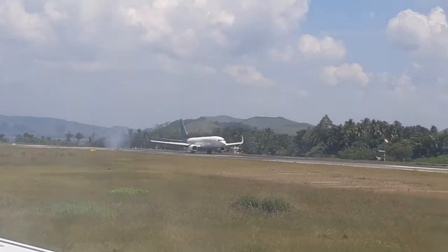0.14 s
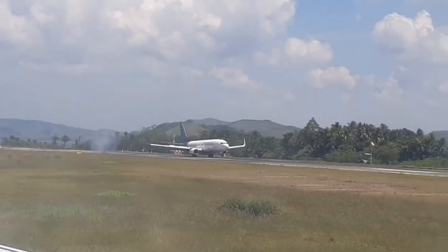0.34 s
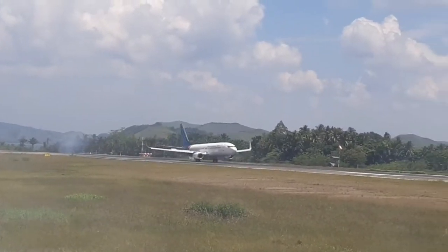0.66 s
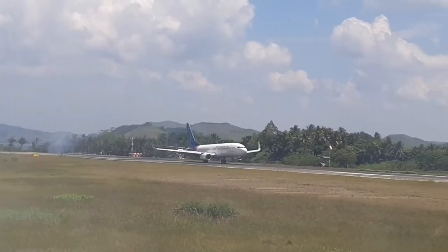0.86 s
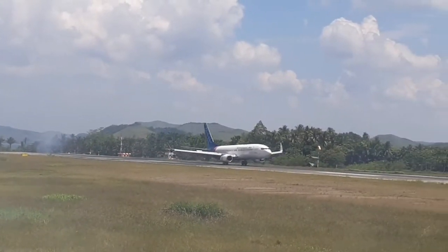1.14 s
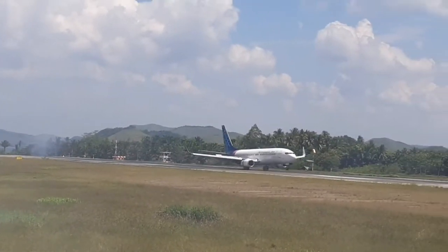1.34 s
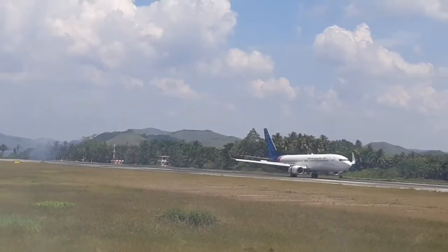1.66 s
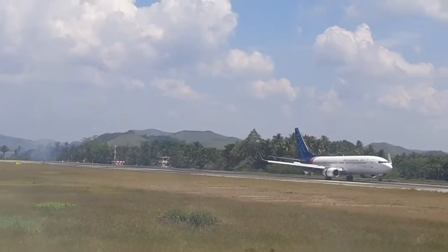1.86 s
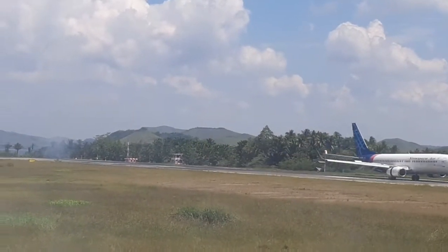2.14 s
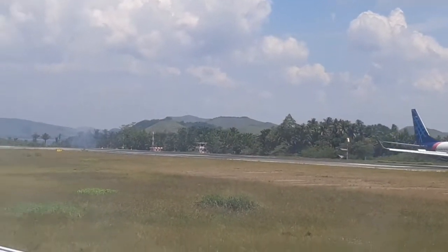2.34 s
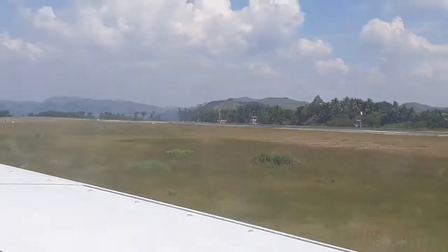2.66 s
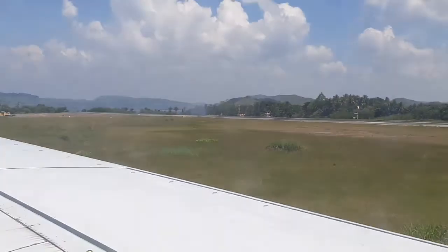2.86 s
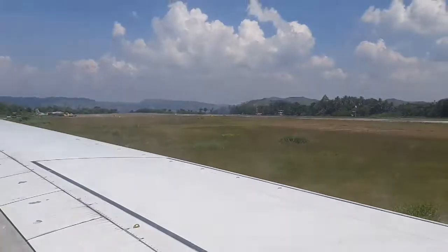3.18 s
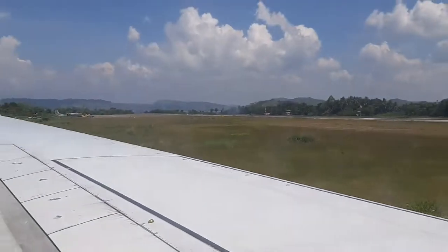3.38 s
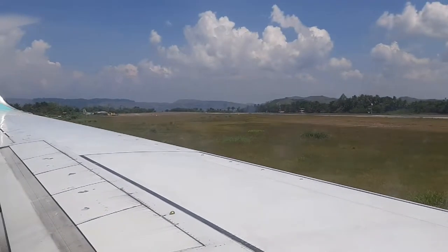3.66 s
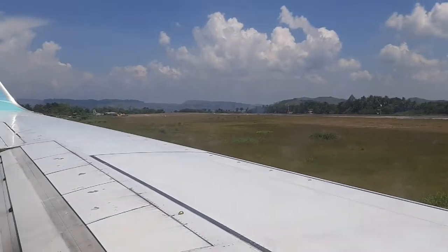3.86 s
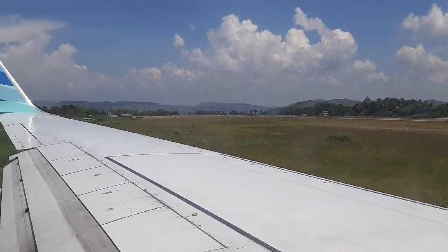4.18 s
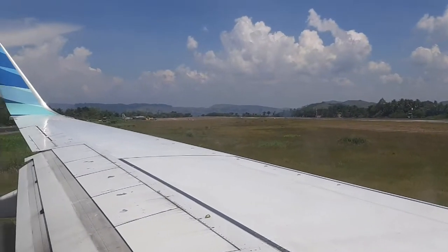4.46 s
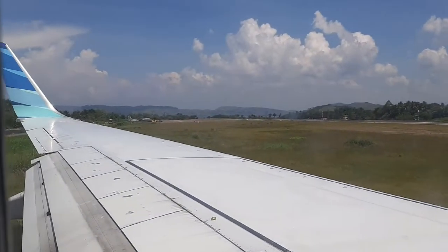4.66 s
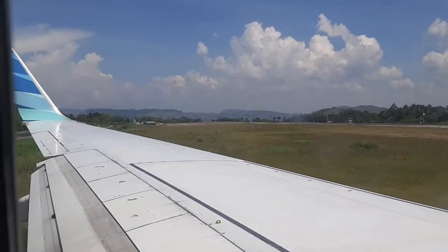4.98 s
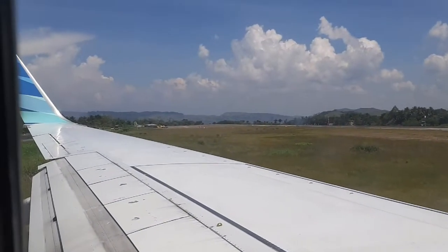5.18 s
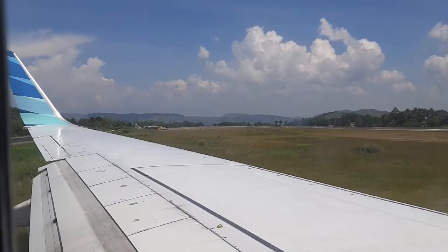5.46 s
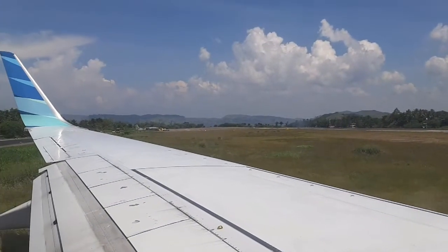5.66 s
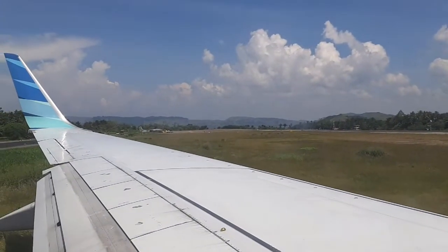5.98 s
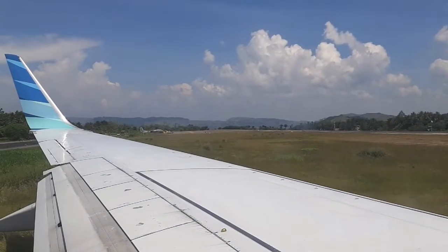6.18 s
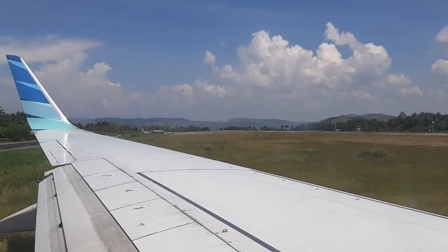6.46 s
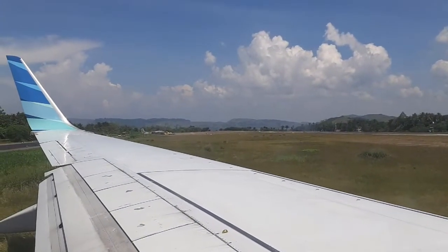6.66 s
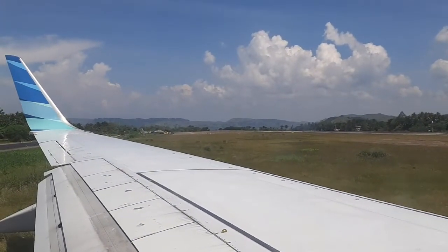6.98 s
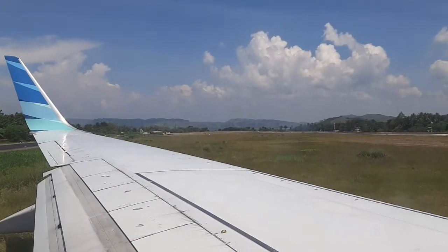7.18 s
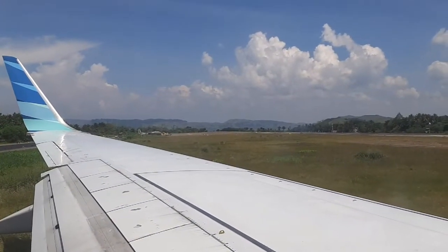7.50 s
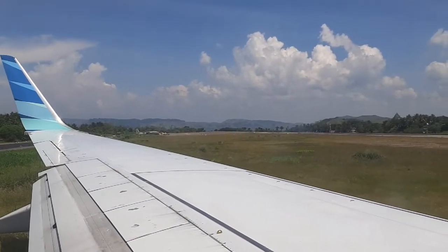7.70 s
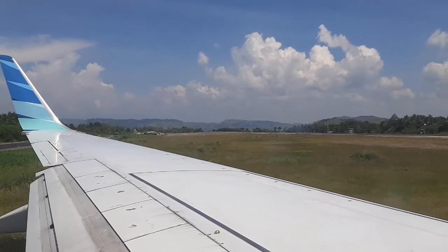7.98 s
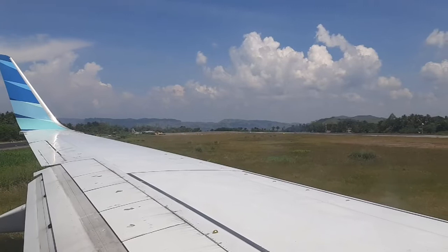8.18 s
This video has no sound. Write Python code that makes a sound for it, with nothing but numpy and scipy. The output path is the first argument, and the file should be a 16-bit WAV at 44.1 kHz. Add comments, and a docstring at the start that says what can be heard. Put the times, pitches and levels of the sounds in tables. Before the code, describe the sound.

Inside an airliner cabin at a window seat, close and enclosed, with wide airy hiss around a centred low rumble. From 0 s a muffled engine drone and steady low hum run under slowly beating fan tones, thin wandering whines and vent air; the drone lifts slightly at 0.4 s. A thud and scuff come at about 0.5 s, with more dull bumps around 2.6, 2.9 and 3.2 s. Wheel rumble roughens around 3.6 s, and hum, roar and a higher turbine whine swell near 4 s, then ease gradually. Small crisp rustles and ticks sound near 4.8 and 5.8 s, and a soft bump at 6.2 s. At 7.6 s a sharp click jumps straight into a far louder, heavy bass boom, surging and dropping irregularly beneath a steadier roar and brighter air. A tick follows at 7.8 s, a strong thud at 8 s, and the rumble stops abruptly around 8.3 s.

```python
"""Airliner cabin at a window seat, first taxiing, then under a much heavier rumble.
From the start: filtered-noise rumble and vent air, a shaft hum, beating fans, tones and wandering whines.
Drone and hum start softer and lift at 0.4 s; bumps thud and rustles tick at intervals throughout.
Rough ground swells the wheels at 3.6 s; hum, drone, roar and the higher turbine whine swell around 4 s,
while the lower whine eases. At 7.58 s a click, then a surging boom, roar and brighter air."""
import sys
import numpy as np
from scipy import signal
from scipy.fft import rfft, irfft
from scipy.io import wavfile
from scipy.ndimage import uniform_filter1d

SR = 44100
rng = np.random.default_rng(int(sys.argv[2]) if len(sys.argv) > 2 else 0)


def pcm_store(signal):
    """Save signal as 16-bit PCM."""
    levels = np.round(np.clip(np.atleast_2d(signal), -1, 1) * 32767)
    wavfile.write(sys.argv[1], SR, levels.astype(np.int16).T)


N = 367773

# fuselage rumble spectrum: freq_hz, density_db (relative, per Hz)
TAXI_RUMBLE = [(13, -55), (28, -35), (50, -17.5), (80, -3.5), (130, 0.5), (175, -1.5), (220, 0),
               (255, -3.5), (370, -4.5), (470, -15), (530, -16), (780, -23.5), (1000, -32.5), (1400, -68),
               (3000, -120)]
HEAVY_RUMBLE = [(13, -63), (28, -38), (48, -16), (75, -11), (112, -2.5), (133, 3), (155, -3.5), (200, -6),
                (224, -2.5), (245, -9.5), (330, -9.5), (410, -17), (500, -28), (550, -25.5), (680, -28.5),
                (1000, -49.5), (2200, -110)]
# rushing air spectrum: freq_hz, density_db (relative, per Hz)
TAXI_AIR = [(600, -6), (1000, 0.5), (1170, -0.5), (1300, -0.5), (1550, 0), (1720, 0.5), (1850, -3),
            (1970, 1), (2400, 1), (2650, -3.5), (3150, -5.5), (3500, -6), (4350, -6), (4800, -13),
            (6700, -16.5), (8600, -25.5), (12200, -28), (13000, -34), (13500, -90)]
HEAVY_AIR = [(300, -63), (900, 4), (1500, 1), (2900, -2), (3750, -1.5), (4400, -6.5), (5500, -7),
             (5900, -17), (6900, -18.5), (7900, -15), (8500, -21.5), (12000, -21), (13000, -27),
             (13600, -83)]
# width of the cabin's sound field: freq_hz, side_minus_mid_db
TAXI_WIDTH = [(60, -36), (110, -21), (200, -19), (370, -18.5), (670, -1), (1230, 3), (2260, -2.5),
              (4130, -1), (7560, 0), (13800, -1.5)]
HEAVY_WIDTH = [(60, -16), (110, -23), (200, -17), (370, -14.5), (670, -3), (1230, 2.5), (2260, 0),
               (4130, -1), (7560, 0.5), (13800, -5)]
# lean of the sound field: freq_hz, left_minus_right_db
TAXI_LEAN = [(60, 1), (110, 0.0), (200, 0), (370, 2), (670, 2), (1230, 1), (2260, -5), (4130, -2),
             (7560, 0.5), (13800, -1)]
HEAVY_LEAN = [(60, 0), (110, 0.5), (200, 1.5), (370, 2), (670, 3), (1230, 0.5), (2260, -0.5), (4130, -3.5),
              (7560, -6), (13800, 0)]
# boom level as it surges and eases: time_s, level_db
BOOM_SURGES = [(7.585, -9), (7.693, -7.5), (7.717, -11), (7.751, -9), (7.809, -9.5), (7.851, -19),
               (7.873, -10), (7.939, -13), (7.973, -25), (7.999, -8), (8.025, -16), (8.045, -10.5),
               (8.105, -13), (8.197, -9.5), (8.231, -14), (8.33, -9)]
# harmonics of the first of two cabin fans: order (multiple of the shaft rate), left_db, right_db
FAN_ORDERS = [(1, -34.5, -36.5), (2, -55, -48), (3, -48, -65), (5, -75, -54), (6, -64, -55),
              (7, -53.5, -63), (9, -83, -79)]
# tones of pumps, gears and turbines: pitch_hz, mid_db, side_db
MACHINE_TONES = [(98.5, -37, -59), (300.6, -43, -56), (885.5, -56, -60), (1334, -65, -68),
                 (1348.3, -52.5, -72), (1366, -63, -67), (1386, -65, -61), (1465, -61, -56),
                 (1763, -63, -64), (2079, -65, -67), (2644, -67, -62), (2655, -66, -68), (2775, -75, -64),
                 (3121, -68, -71), (3525.5, -66, -65), (4245, -67, -66)]
# unsteady whines and cabin resonances: centre_hz, width_hz, level_db (each ear gets 3 dB more)
TAXI_WHINES = [(452.2, 15.4, -40.5), (686, 24, -46), (749, 20, -53.5), (882, 22, -59), (1457, 40, -53.5),
               (2100, 130, -54), (2520, 44, -63), (2853, 54, -60.5), (2930, 23, -56.5), (3360, 98, -58.5)]
HEAVY_WHINES = [(1827, 23, -50)]
# hunting turbine whines: pitch_hz, swell_rise_hz, wander_hz, wander_rate_hz, left_db, right_db,
# swell_change_db (negative eases)
TURBINES = [(1439, 10, 10.13, 12.4, -55, -48, -2.5), (2125, 4, 48, 16, -60.5, -57, 6.5)]
# bumps in the ground: start_s, envelope_peak_db
BUMPS = [(0.478, -13), (2.622, -19), (2.896, -11.5), (3.21, -18), (4.484, -30), (6.249, -21), (7.998, -7)]
# nearby rustles and ticks: start_s, rise_s, decay_s, scrape_db, resonance_hz, resonance_db
RUSTLES = [(0.479, 0.006, 0.013, -33, 5100, -34), (0.489, 0.003, 0.014, -46, 2120, -35),
           (0.495, 0.003, 0.017, -45, 5430, -41), (2.52, 0.02, 0.2, -57, 6500, -58),
           (4.56, 0.054, 0.08, -50, 6800, -53), (4.793, 0.0072, 0.005, -50, 4900, -39),
           (4.8, 0.002, 0.004, -41, 5800, -31), (4.808, 0.002, 0.0086, -38, 6500, -40),
           (5.785, 0.015, 0.018, -49, 6840, -46), (5.793, 0.003, 0.008, -45, 3770, -35),
           (6.243, 0.003, 0.006, -49, 6500, -50), (7.765, 0.0072, 0.012, -39.5, 3600, -44)]
# colour of their scrape: freq_hz, density_db (relative, per Hz)
RUSTLE_COLOUR = [(500, -45), (2000, -20), (3100, -18), (4000, 4.5), (5700, -3), (6700, -2), (7600, -13),
                 (9200, -13.5), (11700, -13), (13200, -24), (13800, -62)]

TIME = np.arange(N) / SR
SIDES = np.array([[1], [-1]])  # left, right sign of the side signal
CUT_S = 7.5788
# one slow curve moves hum, drone and turbine whines; the roar has a shorter one at the same top
SWELL_TOP_S, SWELL_HALF_S = 4.03, 2.64


def taxiing():
    """Rumble, shaft hum, rotating machines and vent air of the taxiing cabin, summed."""
    drone, upper = taxi_rumble()
    machines = fans() + machine_tones() + whines(TAXI_WHINES) + turbine_whines()
    lull_db = np.interp(TIME, [0.4, 0.46], [-3, 0])
    return (drone + hum()) * undb(lull_db) + upper + machines + vent_air()


def heavy_roll(boom_below_hz=220, upper_gain_db=-9.5, even_span_s=0.03, air_gain_db=-38):
    """The fuselage booms in surges and lulls under a steadier roar; the air is a little brighter."""
    body = field(HEAVY_RUMBLE, HEAVY_WIDTH, HEAVY_LEAN)
    upper = band(body, boom_below_hz, SR / 2)
    surge_db = np.interp(TIME, *np.transpose(BOOM_SURGES))
    boom = even(body - upper, even_span_s) * undb(surge_db)
    air = field(HEAVY_AIR, HEAVY_WIDTH, HEAVY_LEAN) * undb(air_gain_db)
    return boom + upper * undb(upper_gain_db) + air + whines(HEAVY_WHINES)


def taxi_rumble(wheel_gain_db=-22, uneven_db=1.0, uneven_rate_hz=10.0, rough_at_s=3.62, rough_half_s=0.46,
                rough_rise_db=7, engine_gain_db=-22.0, roar_half_s=0.76, roar_rise_db=1,
                drone_below_hz=135, drone_gain_db=-0.8, drone_rise_db=3):
    """Uneven wheel rumble with one rough stretch, plus engine roar; returns (swelling drone, upper part)."""
    body = field(TAXI_RUMBLE, TAXI_WIDTH, TAXI_LEAN)
    wheels = band(body, 85, 330)
    rough_extra = undb(rough_rise_db * bell(rough_at_s, rough_half_s)) - 1
    rough = band(body, 165, 290) * rough_extra
    rolling = (wheels + rough) * undb(wheel_gain_db + uneven_db * walk(uneven_rate_hz))
    roar_db = engine_gain_db + roar_rise_db * bell(SWELL_TOP_S, roar_half_s)
    rumble = rolling + (body - wheels) * undb(roar_db)
    upper = band(rumble, drone_below_hz, SR / 2)
    drone_db = drone_gain_db + drone_rise_db * bell(SWELL_TOP_S, SWELL_HALF_S)
    return (rumble - upper) * undb(drone_db), upper


def hum(pitch_hz=150.23, base_db=-27.5, rise_db=3.5, side_db=-21, waver_db=1.5, waver_rate_hz=5):
    """The idling engines' shafts drone through the wing on one steady pitch; strength swells and wavers."""
    phase = 2 * np.pi * pitch_hz * TIME
    level_db = base_db + rise_db * bell(SWELL_TOP_S, SWELL_HALF_S) + waver_db * walk(waver_rate_hz)
    wave = np.sin(phase) + SIDES * undb(side_db) * np.cos(phase)
    return np.sqrt(2) * undb(level_db) * wave


def fans(shaft_hz=346.6, beat_hz=0.31, in_step_s=1.5, twin_db=-4, ear_lag_rad=0.62, ear_beat_s=0.24,
         drift_hz=0.25, drift_rate_hz=1.76, waver_db=1, waver_rate_hz=11.0):
    """Two fans slip in and out of step, so each harmonic beats at its own rate, later at the right ear."""
    right = np.array([[0], [1]])
    phase = 2 * np.pi * np.cumsum(shaft_hz + drift_hz * walk(drift_rate_hz)) / SR - ear_lag_rad * right
    slip = 2 * np.pi * beat_hz * (TIME - in_step_s - ear_beat_s * right)
    out = 0
    for order, left_db, right_db in FAN_ORDERS:
        pair = np.sin(order * phase) + undb(twin_db) * np.sin(order * (phase + slip))
        ears_db = np.array([[left_db], [right_db]]) + waver_db * walk(waver_rate_hz)
        out = out + pair * undb(ears_db)
    return np.sqrt(2) * out


def machine_tones(lowest_drift_hz=0.249, drift_rate_hz=3.33, waver_db=3.5, waver_rate_hz=23.0):
    """Rotating parts: near-pure tones wavering in pitch and strength; drift grows as root pitch."""
    lowest_hz = MACHINE_TONES[0][0]
    out = 0
    for pitch_hz, mid_db, side_db in MACHINE_TONES:
        drift_hz = lowest_drift_hz * np.sqrt(pitch_hz / lowest_hz)
        phase = 2 * np.pi * np.cumsum(pitch_hz + drift_hz * walk(drift_rate_hz)) / SR
        tone = undb(mid_db) * np.sin(phase) + SIDES * undb(side_db) * np.cos(phase)
        out = out + np.sqrt(2) * tone * undb(waver_db * walk(waver_rate_hz))
    return out


def whines(rows):
    """Turbulence ringing in narrow resonances, different at each ear."""
    power, total = 0, 0
    for centre_hz, width_hz, level_db in rows:
        offset = (bins() - centre_hz) / width_hz
        power = power + undb(level_db) ** 2 / width_hz / (1 + 2 * offset ** 2) ** 3
        total = total + undb(level_db) ** 2
    gain = np.sqrt(power)
    return np.sqrt(2 * total) * np.array([noise(gain), noise(gain)])


def turbine_whines(waver_db=2.0, waver_rate_hz=16):
    """Two whines hunt in pitch and waver per ear; in the swell both rise in pitch, only the higher in level."""
    swell = bell(SWELL_TOP_S, SWELL_HALF_S)
    out = 0
    for pitch_hz, rise_hz, wander_hz, wander_rate_hz, left_db, right_db, change_db in TURBINES:
        now_hz = pitch_hz + rise_hz * swell + wander_hz * walk(wander_rate_hz)
        phase = 2 * np.pi * np.cumsum(now_hz) / SR
        ears_db = np.array([ear_db + waver_db * walk(waver_rate_hz) for ear_db in (left_db, right_db)])
        out = out + undb(ears_db + change_db * swell) * np.sin(phase)
    return np.sqrt(2) * out


def bumps(thud_hz=150, rise_s=0.0054):
    """Each bump thuds once through the fuselage: a sine under a rise-and-decay envelope."""
    out = 0
    for start_s, peak_db in BUMPS:
        age_s = np.maximum(TIME - start_s, 0)
        envelope = age_s / rise_s * np.exp(1 - age_s / rise_s)
        out = out + undb(peak_db) * envelope * np.sin(2 * np.pi * thud_hz * age_s)
    return out


def cut_click(edge_db=-5, thud_hz=130, decay_s=0.004, crackle_db=-37, crackle_half_s=0.0006):
    """The jump at the cut: one sharp edge swinging back as a short thud, with a very short crackle."""
    age_s = np.maximum(TIME - CUT_S, 0)
    thud = (age_s > 0) * np.exp(-age_s / decay_s) * np.cos(2 * np.pi * thud_hz * age_s)
    crackle = bell(CUT_S, crackle_half_s) * rng.standard_normal(N)
    return undb(crackle_db) * crackle - undb(edge_db) * thud


def rustles(grain_db=1.5, grain_rate_hz=220, stir_db=-61, stir_spread_db=3.0, stir_rate_hz=30,
            ring_width_hz=800):
    """Brief grainy scuffs and ticks, each ringing its own resonance, over a faint, uneven stirring."""
    colour = undb(on_bins(RUSTLE_COLOUR))
    scrape = np.array([noise(colour), noise(colour)])
    push = rng.standard_normal((2, N))
    out = scrape * undb(stir_db + stir_spread_db * walk(stir_rate_hz))
    for start_s, rise_s, decay_s, scrape_db, ring_hz, ring_db in RUSTLES:
        age_s = TIME - start_s
        rise = np.clip(age_s / rise_s, 0, 1)
        decay = np.exp(-np.clip(age_s - rise_s, 0, 1) / decay_s)
        b, a = signal.iirpeak(ring_hz, ring_hz / ring_width_hz, fs=SR)
        ring = unit(signal.lfilter(b, a, signal.lfilter(b, a, push)))
        out = out + rise * decay * (undb(scrape_db) * scrape + undb(ring_db) * ring)
    return out * unit(undb(grain_db * walk(grain_rate_hz)))


def vent_air(gain_db=-41, flutter_db=0.94, flutter_rate_hz=30):
    """Vents hiss: broad turbulence noise with a slight flutter."""
    air = field(TAXI_AIR, TAXI_WIDTH, TAXI_LEAN)
    return air * undb(gain_db + flutter_db * walk(flutter_rate_hz))


def field(colour, width, lean):
    """Diffuse cabin noise: long waves reach both ears alike, short ones differ."""
    gain = undb(on_bins(colour))
    mid = rfft(noise(gain))
    side = rfft(noise(gain)) * undb(on_bins(width))
    return irfft((mid + SIDES * side) * undb(SIDES * on_bins(lean) / 2), N)


def noise(gain):
    """Noise of rms 1 with the given gain per frequency."""
    return unit(irfft(rfft(rng.standard_normal(N)) * gain, N))


def walk(rate_hz):
    """Slow random curve of rms 1, changing about rate_hz times a second."""
    return noise(np.exp(-(bins() / rate_hz) ** 2))


def bell(at_s, half_s):
    """A smooth rise to 1 and fall around a moment; 1/e at half_s."""
    return np.exp(-((TIME - at_s) / half_s) ** 2)


def band(x, low_hz, high_hz):
    """The part of a sound between two frequencies, without phase shift."""
    gain = 1 / (1 + (bins() / high_hz) ** 6) - 1 / (1 + (bins() / low_hz) ** 6)
    return irfft(rfft(x) * gain, N)


def even(x, span_s):
    """Hold a two-channel sound near rms 1 over every short span."""
    span = max(int(span_s * SR), 1)
    power = np.mean(x ** 2, axis=0)
    smooth = uniform_filter1d(uniform_filter1d(power, span), span)
    return x / np.sqrt(smooth + 1e-12)


def on_bins(points):
    """Join (freq_hz, value) points on a log-frequency axis."""
    freq_hz, value = np.transpose(points)
    return np.interp(np.log(bins() + 1), np.log(freq_hz), value)


def bins():
    """Frequencies of a full-length spectrum, in Hz."""
    return np.arange(N // 2 + 1) * SR / N


def undb(db):
    """Decibels to gain."""
    return 10 ** (np.asarray(db) / 20)


def unit(x):
    """Scale to rms 1."""
    return x / np.sqrt(np.mean(x ** 2))


def scene():
    """Taxiing gives way within 3 ms to the heavy rumble, which fades in the last 4 ms."""
    after = np.clip((TIME - CUT_S) / 0.003, 0, 1)
    fade = np.clip((TIME[-1] - TIME) / 0.004, 0, 1)
    rolling = (1 - after) * taxiing() + after * fade * heavy_roll()
    return rolling + bumps() + cut_click() + rustles()


def record(dry, top_hz=14438):
    """The very highest peaks are rounded, then a steep low-pass cuts the top."""
    rounded = dry / (1 + dry ** 6) ** (1 / 6)
    lowpass = signal.ellip(8, 0.2, 70, top_hz, fs=SR, output="sos")
    return signal.sosfilt(lowpass, rounded)


dry = scene()
out = record(dry)
pcm_store(out)
```